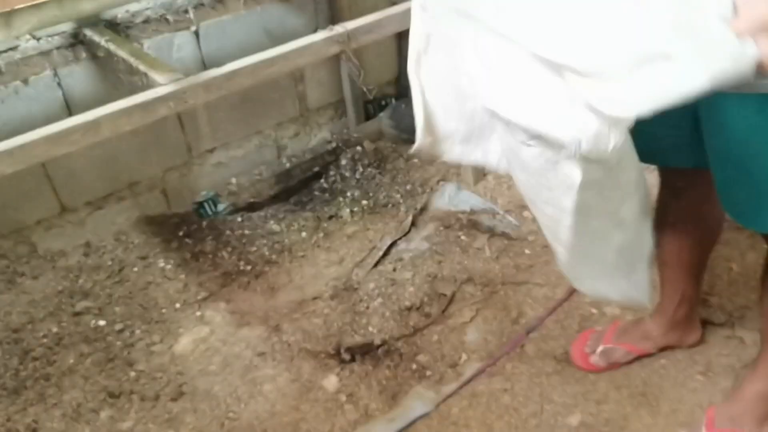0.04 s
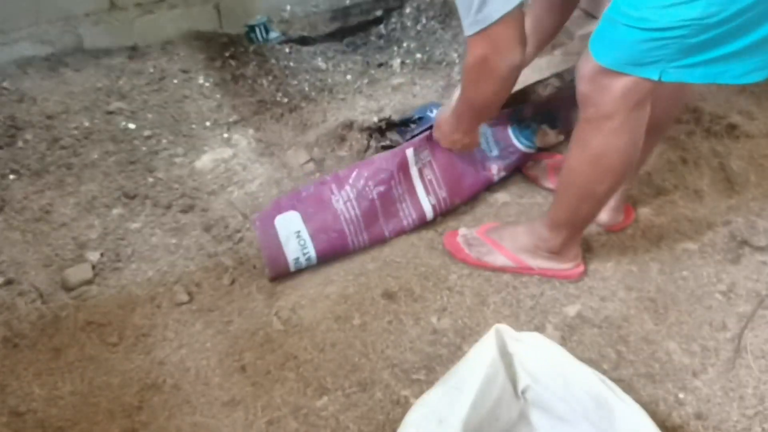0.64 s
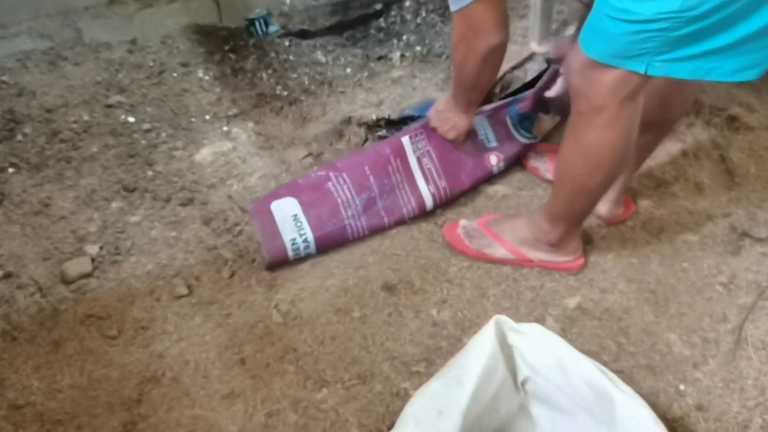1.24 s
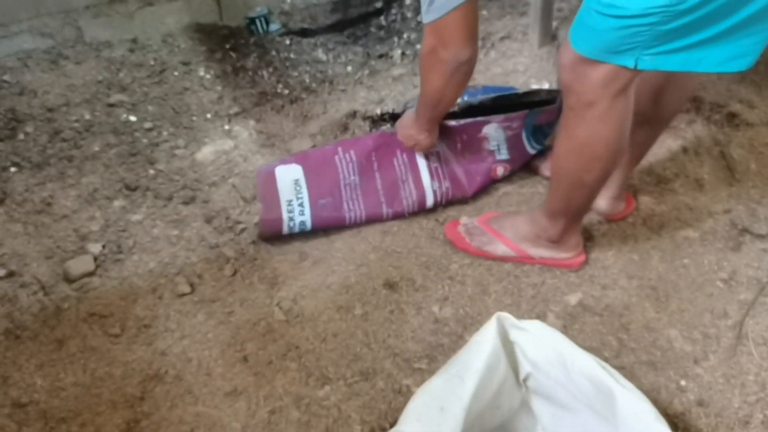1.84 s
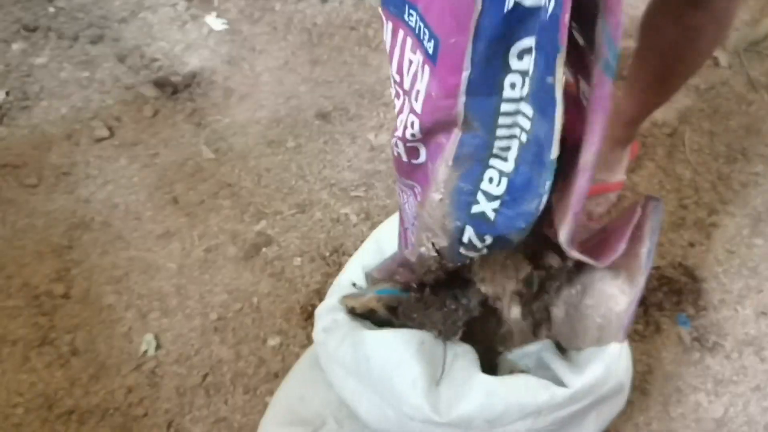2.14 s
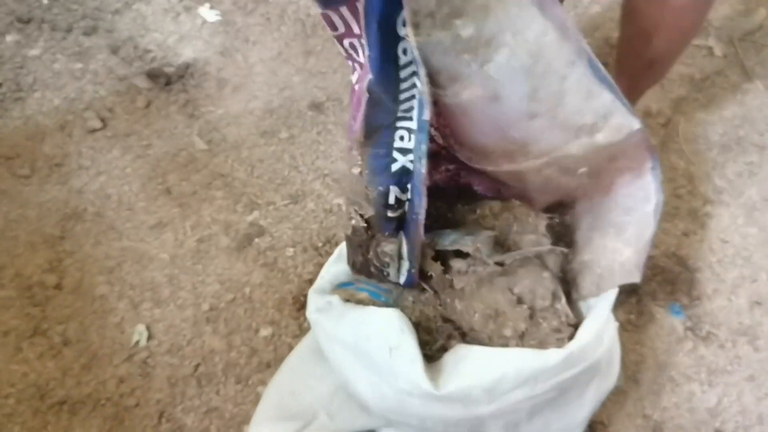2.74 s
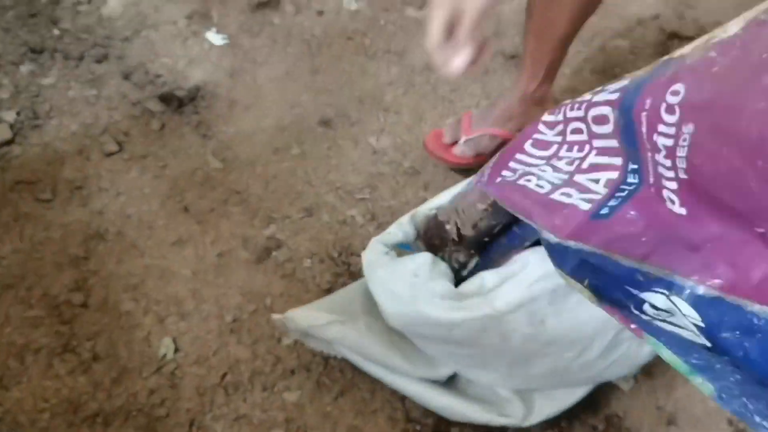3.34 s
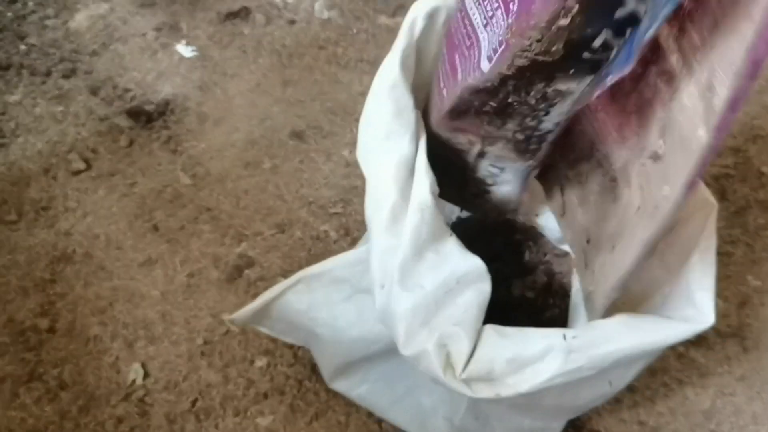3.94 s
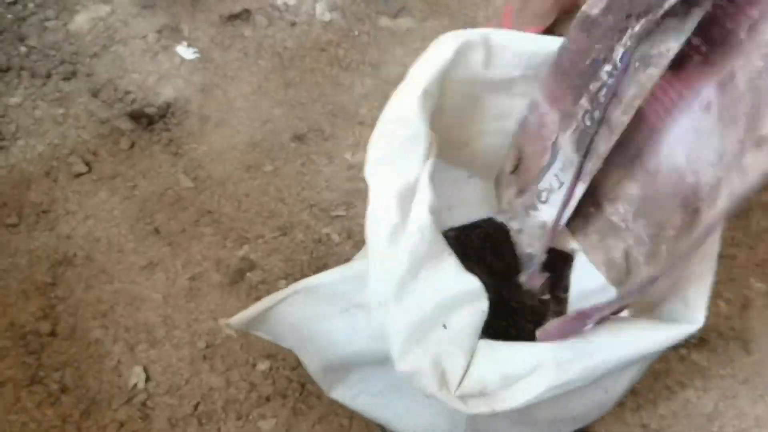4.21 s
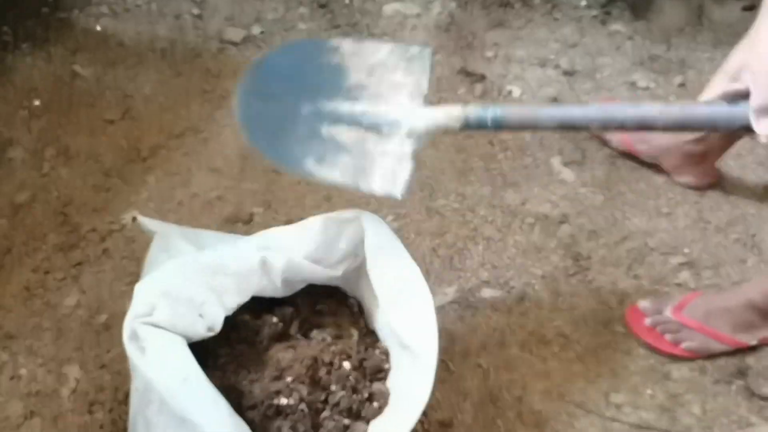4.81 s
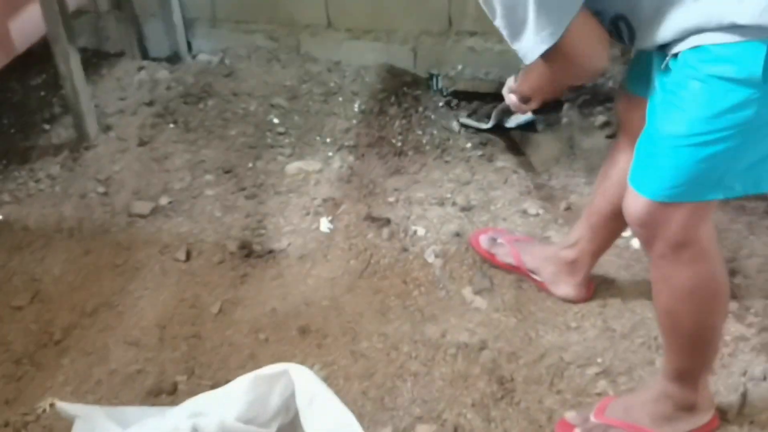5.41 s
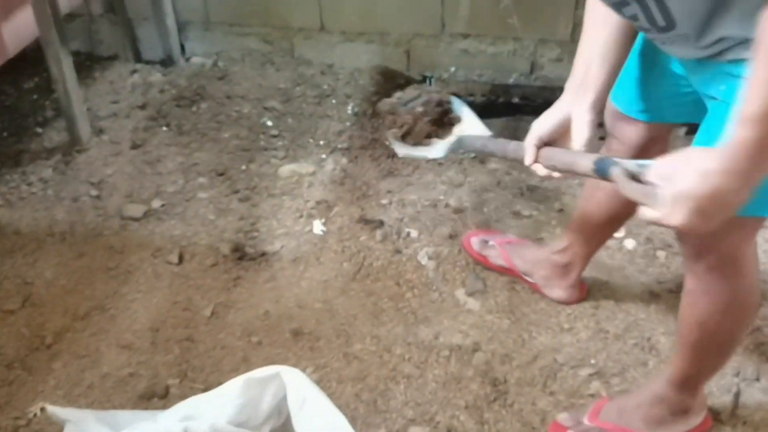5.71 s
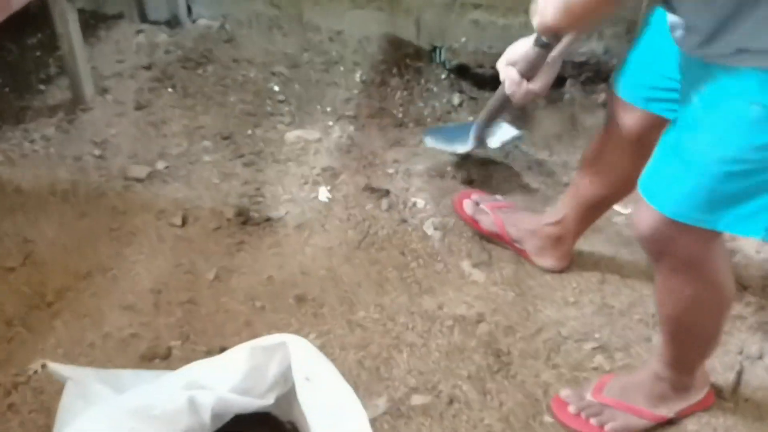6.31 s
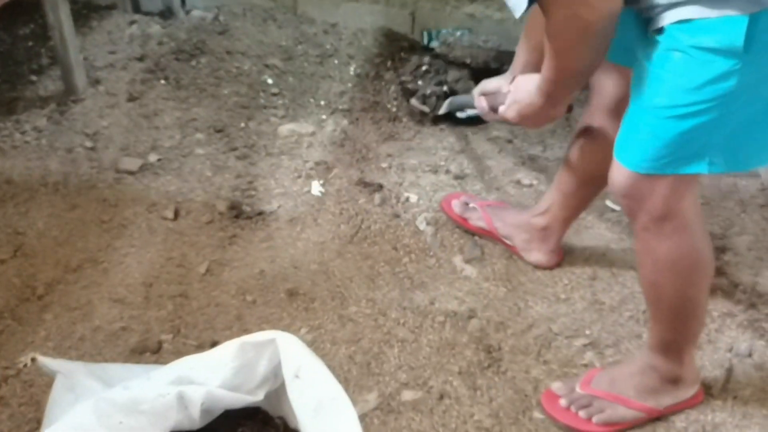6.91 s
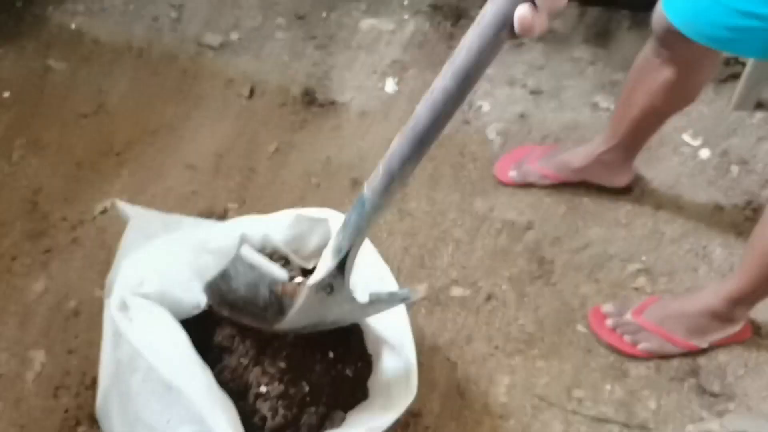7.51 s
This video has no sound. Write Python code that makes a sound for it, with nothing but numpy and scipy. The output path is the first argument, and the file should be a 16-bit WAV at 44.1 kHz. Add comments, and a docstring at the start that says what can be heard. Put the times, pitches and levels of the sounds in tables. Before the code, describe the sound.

A stiff plastic bag rustles and pours dry litter into a sack, then a shovel scrapes and digs while chicks peep and hens cluck.

```python
"""A stiff feed bag rustles close to the microphone, scooping dry litter and tipping it into a woven sack;
then a steel shovel digs, empties and digs again. Lumps thud, husks crunch and dust hisses, all as
showers of tiny impacts; the blade rings where it meets grit. Around the low block-walled coop chicks
peep, hens cluck and a small bird tweets in short falling tones, over the rumble of the yard."""
import sys
import numpy as np
from scipy import signal
from scipy.fft import rfft, irfft
from scipy.io import wavfile

SR = 44100
rng = np.random.default_rng(int(sys.argv[2]) if len(sys.argv) > 2 else 0)


def materialize(psi):
    """Save the field psi as 16-bit PCM at rate SR to the path in sys.argv[1].

    A 1-D psi becomes a single channel; in a 2-D psi each row is a channel.
    """
    bounded = np.clip(np.atleast_2d(psi).T, -1, 1)
    quanta = np.round(bounded * 32767).astype(np.int16)
    wavfile.write(sys.argv[1], SR, quanta)


N = 332934
T = np.arange(N) / SR

# spectra of soft lumps, fine dust and cracking crumbs: frequency_hz, level_db
LUMP_SPECTRUM = [(30, -15.5), (70, -4.5), (130, 4), (200, 1.5), (360, 3.5), (500, -3), (650, -11),
                 (820, -15.5), (1400, -24), (4000, -47.5)]
DUST_SPECTRUM = [(800, -16.5), (2200, -12), (3800, -1), (5200, -5.5), (7400, 0.5), (8800, -14.5),
                 (10200, -6.5), (13000, -16.5), (16000, -24.5)]
CRACK_SPECTRUM = [(200, -77), (600, 9), (1300, 3.5), (2600, 3.5), (5000, -5.5), (7400, -4.5), (8800, -15),
                  (10500, -10), (16000, -20)]


def undb(db):
    """Decibels to gain."""
    return 10 ** (np.asarray(db) / 20)


def unit(x):
    """Scale to rms 1."""
    return x / np.sqrt(np.mean(x ** 2) + 1e-20)


def along(points, hz):
    """Read a (Hz, dB) table on a log-frequency axis."""
    f, db = np.transpose(points)
    return np.interp(np.log(hz + 1), np.log(f), db)


def colour(x, points, band=None):
    """Causal filter of the given colour; with a band, white noise of rms 1 leaves rms 1 in that band."""
    hz = np.fft.rfftfreq(4096, 1 / SR)
    gain = undb(along(points, hz))
    if band:
        gain = gain / np.sqrt(np.mean(gain ** 2 * (hz > band[0]) * (hz < band[1])))
    cepstrum = irfft(np.log(gain))
    cepstrum[1:len(hz) - 1] *= 2
    cepstrum[len(hz):] = 0
    response = irfft(np.exp(rfft(cepstrum)))
    return signal.oaconvolve(x, response[None], axes=1)[:, :N]


def add(track, start_s, sound):
    """Mix a sound into a track."""
    i = max(int(start_s * SR), 0)
    track[..., i:i + sound.shape[-1]] += sound[..., :max(N - i, 0)]


def fade(t60):
    """Exponential decay down to -60 dB."""
    return 1000. ** (-np.arange(int(t60 * SR)) / (t60 * SR))


def scatter(x, t60):
    """A cloud of reflections, different at each microphone, that keeps the power."""
    tail = rng.standard_normal((SR, 2))[:len(fade(t60))].T * fade(t60)
    tail /= np.sqrt(np.sum(tail ** 2, axis=1, keepdims=True))
    return signal.oaconvolve(np.broadcast_to(x, (2, N)), tail, axes=1)[:, :N]


def shower(per_s, spread_db):
    """Tiny impacts at random moments: many weak, few strong."""
    hit = rng.random(N) < per_s / SR
    size = undb(spread_db * np.minimum(rng.exponential(size=N), 4.5))
    return unit(hit * size * rng.choice([-1, 1], N))


def yard(level_db=-48.5):
    """The open yard behind everything: a low rumble under faint hiss, slowly swelling."""
    # outdoor background: frequency_hz, level_db
    spectrum = [(15, -62), (25, -2.5), (103, 13), (271, -4.5), (604, -28.5), (1280, -19), (2130, -29),
                (2850, -20.5), (4040, -32), (5570, -28.5), (7680, -17), (9020, -74), (10000, -27),
                (15000, -41.5)]
    noise = rng.standard_normal((3, N))
    swell_db = 0.24 * np.interp(T, np.linspace(0, T[-1], 24), rng.standard_normal(24))
    rumble = colour(noise[:1], [(150, -5), (600, 1.5), (2000, -59)])
    air = colour(noise[1:], [(40, 3), (150, -17.5), (600, 11.5), (2000, 0)])
    return unit(colour(rumble + air, spectrum)) * undb(level_db + swell_db)


def notes(table, pan_db, fall, waver, waver_hz, stretch, rasp, right_lag_s=0.00036):
    """Falling tones that swell, waver, rasp and fade. Rows: peak_s, pitch_hz, level_db, width_s."""
    out = np.zeros((2, N))
    t = np.arange(-SR // 14, SR // 14) / SR
    smooth = signal.butter(2, waver_hz, fs=SR, output="sos")
    pan = unit(undb(np.array([[pan_db], [-pan_db]]) / 2))  # positive is left
    lag_s = np.array([[0], [right_lag_s]])
    for peak_s, hz, level_db, width_s in table:
        wobble, *flutter = unit(signal.sosfilt(smooth, rng.standard_normal((3, len(t)))))
        # the fall is steep at first and flattens out; no two notes bend alike
        curve = np.expm1(-np.maximum(t, -min(1.4 * width_s, 0.03)) / 0.03)
        bend = fall * rng.uniform(0.4, 1.4) * 0.024 * curve
        phase = 2 * np.pi * (np.cumsum(hz * (1 + bend + waver * wobble)) / SR - hz * lag_s)
        swell = signal.windows.tukey(len(t)) * np.exp(-np.abs(t / (width_s * stretch)) ** 2.77)
        note = swell * (1 + rasp * np.array(flutter)) * np.sin(phase)
        add(out, peak_s + t[0], undb(level_db) * pan * note)
    return out


def far_hens(count=45):
    """Hens further back grumble softly at random."""
    table = [(0.5 + 7 * when, 1200 + 350 * pitch, -59 + 9 * loud, 0.02)
             for when, pitch, loud in rng.random((count, 3))]
    grumbles = notes(table, pan_db=-2, fall=0.597, waver=0.043, waver_hz=340, stretch=1, rasp=0.33)
    return scatter(grumbles, t60=0.071)


def far_chicks(count=260):
    """The brood peeps at random, back on the right and blurred by the walls."""
    table = [(0.35 + 7.2 * when, 2600 + 1650 * pitch, -56 + 13 * loud, 0.009 + 0.0072 * width)
             for when, pitch, loud, width in rng.random((count, 4))]
    brood = notes(table, pan_db=-7.5, fall=2.8, waver=0.029, waver_hz=710, stretch=1, rasp=0.57)
    return scatter(brood, t60=0.092)


def near_birds():
    """Chicks and a small bird to the right, hoarse hens near the middle, reflected by block walls."""
    # calls of chicks, hens and the small bird: peak_s, pitch_hz, level_db, width_s
    peeps = [(.469, 3060, -34.5, 0.015), (.515, 3950, -39, .007), (.553, 3400, -32, 0.014),
             (.726, 3070, -32, 0.0046), (.88, 2827, -21, 0.0076), (.942, 2570, -32, 0.015),
             (.948, 3500, -17.5, .011), (1.273, 4230, -28, 0.0088), (1.361, 2870, -34.5, 0.012),
             (1.56, 3470, -30, 0.0066), (1.67, 3845, -34, 0.014), (1.667, 2800, -32.5, 0.0041),
             (1.769, 3520, -42, 0.018), (1.823, 4280, -39, .008), (1.881, 3600, -33, .006),
             (2.089, 2614, -17.5, 0.0055), (2.155, 2510, -32, .013), (2.21, 2960, -24.5, 0.021),
             (4.467, 2520, -31.5, 0.0025), (4.544, 2840, -24, 0.013), (4.55, 4030, -40, 0.018),
             (4.573, 3030, -37, 0.014), (4.619, 2860, -32, 0.012), (4.658, 2570, -42.5, 0.017),
             (4.684, 4100, -37.5, 0.029), (4.736, 4000, -36.5, 0.012), (4.741, 2700, -27.5, 0.0036),
             (5.335, 2870, -35.5, 0.021), (5.57, 2460, -28, 0.0091), (5.615, 2590, -26, 0.0035),
             (5.701, 2470, -35.5, 0.0052), (5.766, 4190, -39, 0.02), (5.902, 2790, -37.5, 0.007),
             (5.94, 3700, -32.5, 0.016), (6.06, 4221, -35, 0.018), (6.131, 2880, -34, .007),
             (6.167, 3950, -32.5, 0.019), (6.18, 3520, -29, 0.0042), (6.306, 3893, -35.5, 0.02),
             (6.41, 3560, -30.5, 0.02), (6.497, 3060, -34, 0.0094), (6.55, 3290, -26.5, .006),
             (6.621, 3020, -34, 0.0064), (6.891, 3020, -40, 0.016), (6.93, 2920, -48, .016),
             (7.033, 3050, -47, .009), (7.097, 4490, -43.5, 0.031), (7.127, 3020, -45, 0.01),
             (7.312, 3670, -48, 0.012), (7.35, 3070, -46.5, 0.058), (7.385, 3760, -40.5, 0.02)]
    clucks = [(.839, 1547, -34.5, 0.017), (.864, 1430, -33, 0.017), (1.02, 1510, -21.5, 0.007),
              (1.06, 1466, -44, 0.0177), (4.09, 1015, -39, 0.026), (6.825, 1208, -41, 0.0033),
              (6.871, 1560, -41.5, 0.0085), (6.998, 1400, -51, 0.078), (7.091, 1344, -48, 0.018),
              (7.179, 1360, -43, 0.02), (7.298, 1390, -46.5, .014)]
    tweets = [(1.04, 7670, -38.5, 0.034), (1.16, 7700, -36, 0.033), (1.946, 7780, -31, 0.023),
              (2.154, 7800, -32.5, 0.01), (3.136, 7720, -32.5, 0.018), (3.83, 7480, -25, 0.011),
              (3.944, 7800, -35, 0.018), (4.628, 7800, -37, 0.019), (4.733, 8040, -43, 0.014)]
    chicks = notes(peeps, pan_db=-7.5, fall=2.8, waver=0.022, waver_hz=625, stretch=0.85, rasp=0.043)
    # every peep carries a hoarse fringe around its tone
    fringe = notes(peeps, pan_db=-9, fall=3.6, waver=0.1253, waver_hz=907, stretch=1.38, rasp=0.1)
    hens = notes(clucks, pan_db=2, fall=1.24, waver=0.09, waver_hz=330, stretch=0.85, rasp=0.38)
    small_bird = notes(tweets, pan_db=-5, fall=2, waver=0.0225, waver_hz=397, stretch=1.1, rasp=0.23)
    flock = undb(-5) * chicks + undb(-12.5) * fringe + undb(-1) * hens + undb(-8) * small_bird
    return flock + undb(3) * scatter(flock, t60=0.038)


def bumps():
    """Hollow bumps near the middle, each a brief low note of unsteady pitch."""
    # hollow resonances: peak_s, pitch_hz, level_db, width_s
    knocks = [(.465, 255.4, -30.5, 0.0054), (.565, 292.5, -35, 0.025), (.67, 266, -30.5, 0.0079),
              (.95, 363, -25.5, 0.0071), (.992, 322, -31.5, 0.018), (1.023, 412, -27, 0.0081),
              (1.5, 279.3, -36, 0.034), (2.852, 377, -33, 0.013), (4.04, 325.9, -29, 0.0084),
              (5.62, 413, -27, 0.005), (6.175, 390.5, -34, 0.0057)]
    return notes(knocks, pan_db=0.5, fall=1, waver=0.097, waver_hz=118, stretch=1.38, rasp=0.033)


def blow(rise_s, t60):
    """Force of a crumbly contact: it builds up, then dies away."""
    return np.r_[np.linspace(0, 1, int(rise_s * SR)) ** 2, fade(t60)]


def strokes(table, attack_s, t60, jerk_db=0, jerks_per_s=40):
    """Movements build up, hold and die away, roughened by jerk_db; one force for each level column."""
    power = np.zeros((len(table[0]) - 2, N))
    for start_s, length_s, *levels_db in table:
        hold = np.ones(int(max(length_s - attack_s / 2, 0) * SR))
        shape = np.r_[np.linspace(0, 1, int(attack_s * SR)), hold, fade(t60)]
        add(power, start_s - attack_s / 2, np.outer(undb(levels_db), shape) ** 2)
    jerks = rng.standard_normal(int(T[-1] * jerks_per_s) + 2)
    return np.sqrt(power) * undb(jerk_db * np.interp(T * jerks_per_s, np.arange(len(jerks)), jerks))


def grains(force, per_s, spread_db, t60):
    """A shower of brittle grains, each a tiny burst of noise, different at each microphone."""
    impacts = shower(per_s, spread_db) * force
    decay = fade(t60) ** 2
    power = signal.oaconvolve(impacts ** 2, decay / np.sum(decay))[:N]
    return np.sqrt(np.abs(power)) * rng.standard_normal((2, N))


def chips(force, low_hz, high_hz, spread_db, count, t60=0.03):
    """Dry chips tick against each other while the force lasts, each ringing briefly at its own pitch."""
    when, pitch, left, right, strength = rng.random((count, 5)).T
    decay = fade(t60)[:SR // 50]
    steps, moving = np.arange(len(decay)), np.flatnonzero(force)
    starts = moving[(when * len(moving)).astype(int)]
    samples = (starts[:, None] + steps).ravel()
    size = undb(spread_db * np.minimum(-np.log(1 - strength), 4))
    phase = np.outer(2 * np.pi / SR * (low_hz + (high_hz - low_hz) * pitch), steps)
    ticks = []
    for offset in (left, right):
        rings = np.outer(size, decay) * np.sin(phase + 2 * np.pi * offset[:, None])
        ticks.append(np.bincount(samples, rings.ravel(), N)[:N])
    # as much power per Hz as white noise under the same force
    share = (high_hz - low_hz) / (SR / 2) * len(moving) / N
    return unit(np.array(ticks)) * np.sqrt(share) * force


def lumps(force):
    """Soft lumps tumble; such long waves reach both microphones nearly alike."""
    thuds = shower(per_s=1500, spread_db=3) * force
    diffuse = undb(-20.5) * force * rng.standard_normal((2, N))
    return colour(thuds + diffuse, LUMP_SPECTRUM, band=(90, 650))


def crinkles():
    """A crease in the woven plastic snaps over: one sharp tick, then a quick run of smaller ones."""
    # the stiff bag creasing: start_s, snap_db, run_db
    creases = [(0.0603, -39, -47), (0.699, -37, -37), (0.749, -37, -43), (0.919, -23, -39),
               (0.9948, -32, -31), (1.204, -28, -36.5), (1.395, -38, -56), (1.5244, -37, -41),
               (1.619, -35, -41.5), (1.663, -39, -41), (2.6179, -41, -44), (2.7297, -34, -52),
               (2.7794, -33, -49), (2.855, -33, -34), (2.9807, -17, -45), (4.051, -36, -36),
               (4.2827, -36, -39.5), (4.535, -42, -42)]
    first, run = np.zeros((2, N))
    for start_s, snap_db, run_db in creases:
        add(first, start_s, undb(snap_db) * fade(t60=0.014))
        add(run, start_s, undb(run_db) * blow(rise_s=0.0022, t60=0.044))
    snap = colour(first * rng.standard_normal((2, N)), DUST_SPECTRUM, band=(3000, 14000))
    ticks = grains(run, per_s=3700, spread_db=-8, t60=0.0062)
    return undb(-10) * snap + undb(-1.5) * colour(ticks, DUST_SPECTRUM, band=(4500, 12000))


def clods(rise_s=0.014):
    """Each clod thumps and bursts into crumbs."""
    # clods landing and the bag slapping: time_s, thump_db, crack_db
    landings = [(.383, -30, -64), (0.451, -50, -39), (.554, -38, -53.5), (0.695, -31, -38.5),
                (0.982, -30, -36.5), (1.356, -27, -45), (1.944, -22.5, -41), (1.965, -31, -68),
                (2.171, -25, -33.5), (2.237, -47, -29.5), (2.286, -23.5, -22), (2.339, -29, -20),
                (2.405, -23.5, -26), (2.475, -15, -20.5), (2.624, -51, -30.5), (2.693, -34, -56),
                (2.723, -26, -44), (2.733, -47, -27), (3.005, -52, -31), (3.644, -34, -37),
                (3.698, -44, -25), (3.732, -28, -26.5), (3.803, -14.5, -26), (3.896, -24, -34),
                (6.546, -46, -46), (6.824, -37, -54)]
    thump, burst = np.zeros((2, N))
    for time_s, thump_db, crack_db in landings:
        add(thump, time_s - rise_s / 2, undb(thump_db) * blow(rise_s, t60=0.063))
        add(burst, time_s - rise_s / 2, undb(crack_db) * blow(rise_s, t60=0.081))
    body = shower(per_s=3200, spread_db=5.5) * thump
    crumbs = grains(burst, per_s=1400, spread_db=3.5, t60=0.0031)
    return (undb(-5) * colour(body[None], LUMP_SPECTRUM, band=(90, 650))
            + undb(-3.5) * colour(crumbs, CRACK_SPECTRUM, band=(900, 2200)))


def blade(push):
    """The steel blade rings in its modes."""
    # shovel blade modes: pitch_hz, level_db, t60_s
    modes = [(804, -3, 0.047), (1090, -19.5, 0.08), (1920, 5, 0.093), (2370, -15.5, 0.14),
             (2840, -10.5, 0.022), (3530, 5, 0.074), (4260, 3, 0.087), (5150, 4, 0.18), (5990, 9, 0.082),
             (6071, 2.5, 0.17), (6800, -18, 0.2), (7300, 5, 0.22), (7730, 0, 0.16), (9900, 10, 0.069),
             (11600, -10, 0.078)]
    t = T[:SR // 2]
    ring = sum(undb(db) * np.sin(2 * np.pi * hz * t) * 1000 ** (-t / t60) / np.sqrt(t60)
               for hz, db, t60 in modes)
    return signal.oaconvolve(push, ring[None] / np.sqrt(np.sum(ring ** 2)), axes=1)[:, :N]


def stones(width=0.2, rise_s=0.016):
    """The blade catches and judders in a short harsh rasp; bare steel rings on, buried steel does not."""
    # blade meeting ground and stones: time_s, level_db, centre_hz, t60_s, ring_db
    strikes = [(5.053, -36.5, 880, 0.1, -6), (5.058, -46, 1800, 0.057, -6), (5.146, -16.5, 6250, 0.03, -6),
               (5.178, -15, 8050, 0.034, -12), (5.189, -39.5, 910, 0.2, -4),
               (5.428, -31.5, 2660, 0.19, -14), (5.45, -26, 2800, 0.19, -0.5),
               (5.48, -23, 3200, 0.046, -27), (5.637, -29.5, 11400, 0.036, -28),
               (5.958, -26, 5410, 0.048, -14), (6.351, -36.5, 800, 0.04, -3), (6.364, -33, 815, 0.029, -26),
               (6.682, -16, 2900, 0.033, -15.5), (7.424, -27.5, 4050, 0.1, -5.5)]
    rasp, push = np.zeros((2, 2, N))
    for time_s, level_db, centre_hz, t60, ring_db in strikes:
        edges_hz = [centre_hz / (1 + width), centre_hz * (1 + width)]
        bandpass = signal.butter(1, edges_hz, "band", fs=SR, output="sos")
        judder = unit(signal.sosfilt(bandpass, rng.standard_normal((2, SR // 4))))
        shape = blow(rise_s, t60)[:SR // 4]
        contact = undb(level_db) * judder[:, :len(shape)] * shape
        add(rasp, time_s - 0.59 * rise_s, contact)
        add(push, time_s - 0.34 * rise_s, undb(ring_db) * contact)
    spectrum = [(300, 5.5), (1000, 0.5), (7500, -1.5), (8800, -9), (10500, -1.5), (16000, -14.5)]
    return colour(rasp + undb(-0.5) * blade(push), spectrum)


def shovel():
    """Grit grinds and slides along the blade; the loaded steel rings faintly, its dish sounds hollow."""
    # the blade pushes through the heap: start_s, length_s, soil_db, grit_db
    digs = [(5.05, 0.096, -44.5, -65), (5.17, 0.058, -38.5, -47), (5.225, 0.22, -47, -51.5),
            (5.43, 0.099, -41.5, -43.5), (5.53, 0.15, -39, -53), (5.7, .22, -47, -62.5),
            (5.96, 0.047, -45.5, -50), (6.03, 0.095, -41, -48.5), (6.16, 0.039, -43.5, -49.5),
            (6.35, 0.011, -38, -64), (6.4, 0.3, -44.5, -55.5), (6.76, 0.22, -48, -57.5),
            (6.97, 0.39, -48.5, -60.5), (7.41, .11, -49, -57)]
    # litter slides along the steel: start_s, length_s, hiss_db
    slides = [(5.055, 0.021, -45.5), (5.092, 0.12, -38), (5.22, 0.14, -46), (5.435, 0.054, -47),
              (5.53, .02, -64), (5.73, 0.0062, -57), (5.958, 0.038, -39.5), (6.04, 0.13, -63),
              (6.39, 0.089, -43), (6.5, 0.19, -46.5), (6.77, 0.028, -57), (7.415, 0.082, -40.5)]
    # grinding grit, sliding litter and the loaded dish: frequency_hz, level_db
    grit_spectrum = [(300, -31), (850, -7), (1300, 11), (2000, 8), (2500, 7), (3400, 6), (4500, 6.5),
                     (8000, -6), (16000, -21)]
    slide_spectrum = [(1000, -68), (2300, -6), (3400, -1), (5200, -5), (7400, 2.5), (8800, -12),
                      (10200, -6), (13000, -13), (16000, -30)]
    dish_spectrum = [(400, -32), (700, -15), (830, -3), (1000, -7), (1500, -24), (4000, -53)]
    soil, grind = strokes(digs, attack_s=0.027, t60=0.12)
    slide, = strokes(slides, attack_s=0.032, t60=0.17)
    grit = undb(-4.5) * grains(grind, per_s=390, spread_db=6.5, t60=0.079)
    grit += undb(-9.5) * chips(grind, low_hz=663, high_hz=5250, spread_db=1, count=1200)
    rub = undb(1) * grains(slide, per_s=1300, spread_db=0, t60=0.019)
    rub += undb(-5.5) * chips(slide, low_hz=1945, high_hz=14950, spread_db=0.4, count=2800, t60=0.018)
    steel = blade(grains(slide, per_s=220, spread_db=4, t60=0.004))
    dish = grains(soil, per_s=110, spread_db=0.5, t60=0.039)
    return (undb(-6.5) * lumps(soil) + undb(-4.5) * steel
            + colour(grit, grit_spectrum, band=(1700, 2250))
            + colour(rub, slide_spectrum, band=(4900, 8000))
            + undb(-16.5) * colour(dish, dish_spectrum, band=(700, 1000)))


def sack():
    """Litter is shoved onto the bag, slides off and drops into the hollow sack; woven plastic rustles."""
    # litter shoved over the ground, and poured into the sack: start_s, length_s, lumps_db, husks_db
    shoves = [(.34, 0.084, -39, -45), (.46, 0.073, -38.5, -52.5), (.53, 0.052, -33, -45.5),
              (.66, 0.098, -46, -51.5), (.755, 0.03, -39, -49), (.82, 0.079, -37.5, -51.5),
              (.92, 0.12, -36.5, -47), (1.11, 0.222, -42.5, -53.5), (1.35, 0.042, -37, -47),
              (1.47, 0.083, -37.5, -44.5), (1.58, 0.089, -43.5, -52), (1.71, 0.046, -39.5, -46.5),
              (1.81, 0.12, -38.5, -53.5), (1.94, 0.029, -27, -38.5), (2.055, 0.048, -36, -41),
              (4.55, 0.043, -46.5, -79), (4.755, 0.02, -40.5, -52), (4.855, 0.012, -47, -61)]
    pours = [(2.165, 0.13, -28.5, -36.5), (2.28, 0.23, -26.5, -35.5), (2.51, 0.17, -36, -40),
             (2.64, .13, -36.5, -38.5), (2.84, 0.0088, -33, -44.5), (2.89, 0.089, -52, -51.5),
             (2.99, 0.071, -34, -38.5), (3.07, 0.26, -40, -46), (3.35, 0.046, -39, -45),
             (3.455, .15, -36, -45), (3.64, .11, -27, -35), (3.78, 0.013, -21.5, -28),
             (3.875, 0.037, -26, -35.5), (3.96, 0.14, -38, -44), (4.14, 0.11, -41, -52.5),
             (4.31, 0.12, -47.5, -52)]
    # woven plastic slides over itself: start_s, length_s, hiss_db
    rustles = [(0, 0.1, -51), (.15, 0.18, -60), (.55, 0.04, -52.5), (.775, 0.01, -53.5),
               (.925, 0.082, -46.5), (1.11, 0.1, -55), (1.27, 0.18, -55), (1.51, 0.016, -58),
               (1.6, 0.11, -62.5), (2.055, .06, -45), (2.18, 0.42, -43.5), (2.76, 0.0083, -43),
               (2.97, 0.022, -41), (2.992, .045, -35.5), (3.08, 0.17, -50), (3.21, 0.078, -40.5),
               (3.41, 0.11, -39.5), (3.48, 0.091, -38), (3.88, 0.024, -44), (4.15, 0.12, -52.5),
               (4.55, 0.26, -60.5), (4.77, 0.099, -63), (5.0, 0.012, -54)]
    # husks, the sack's hollow body and the sheen of its weave: frequency_hz, level_db
    husk_spectrum = [(300, -30.5), (650, 3.5), (900, 5), (1300, 9), (1900, 1.5), (2600, 8.5), (3600, -3),
                     (5000, -7.5), (9000, -32), (16000, -49)]
    hollow_spectrum = [(200, -22), (380, -5.5), (520, -2), (660, -6.5), (850, -15), (2000, -31)]
    weave_spectrum = [(1000, -26), (2000, 3), (4000, -14), (7400, 0), (8800, -6), (10200, 0.5), (13000, 2),
                      (16000, -15)]
    shove, scuff = strokes(shoves, attack_s=0.017, t60=0.22, jerk_db=2.5)
    pour, spill = strokes(pours, attack_s=0.022, t60=0.24, jerk_db=2.5)
    rustle, = strokes(rustles, attack_s=0.0099, t60=0.23, jerk_db=3.8)
    tumble = np.hypot(shove, undb(-2) * pour)
    crunch = np.hypot(scuff, spill)
    shed = undb(-7.5) * np.hypot(spill, undb(-4) * scuff)  # crunching husks shed fine dust
    hiss = np.hypot(undb(-0.5) * rustle, shed)
    husks = undb(-4.5) * grains(crunch, per_s=580, spread_db=3.5, t60=0.03)
    husks += undb(-3.5) * chips(crunch, low_hz=413, high_hz=5017, spread_db=0.5, count=3200)
    dust = undb(-0.5) * grains(hiss, per_s=2400, spread_db=3, t60=0.026)
    dust += undb(-5) * chips(hiss, low_hz=2130, high_hz=15470, spread_db=2, count=4500)
    crackle = grains(hiss, per_s=160, spread_db=2, t60=0.0027)
    patter = shower(per_s=900, spread_db=4) * pour
    weave = grains(rustle, per_s=510, spread_db=-1.5, t60=0.0072)
    return (undb(-4.5) * lumps(tumble)
            + colour(husks, husk_spectrum, band=(750, 2100))
            + colour(dust, DUST_SPECTRUM, band=(4900, 7200))
            + undb(-15) * colour(crackle, CRACK_SPECTRUM, band=(4900, 7200))
            + undb(-11.5) * colour(patter[None], hollow_spectrum, band=(400, 750))
            + undb(-6) * colour(weave, weave_spectrum, band=(9500, 14000)))


def scene():
    """Bag and shovel up close, birds around them, the yard behind; the coop adds a short tail."""
    # how the ground sounds reach the two microphones: frequency_hz, left_minus_right_db
    balance = [(60, 6.5), (120, 6.5), (380, 0.5), (700, -1.5), (1300, 0.5), (2400, -5.5), (4400, -7),
               (8000, -5), (10500, 4.5), (15000, -3.5)]
    ground = sack() + shovel() + clods() + crinkles() + stones() + yard()
    left = colour(ground[:1], [(hz, db / 2) for hz, db in balance])
    right = colour(ground[1:], [(hz, -db / 2) for hz, db in balance])
    mix = np.vstack([left, right]) + undb(-2) * bumps() + near_birds() + far_chicks() + far_hens()
    return mix + undb(-26.5) * scatter(mix, t60=0.56)


def record(dry, top_hz=15600):
    """The phone cuts the highest treble."""
    return signal.sosfilt(signal.ellip(8, 0.2, 70, top_hz, fs=SR, output="sos"), dry)


dry = scene()
out = record(dry)
materialize(out)
```